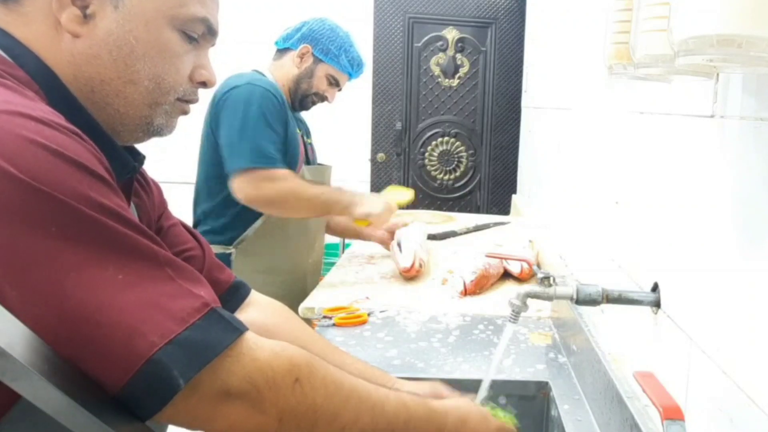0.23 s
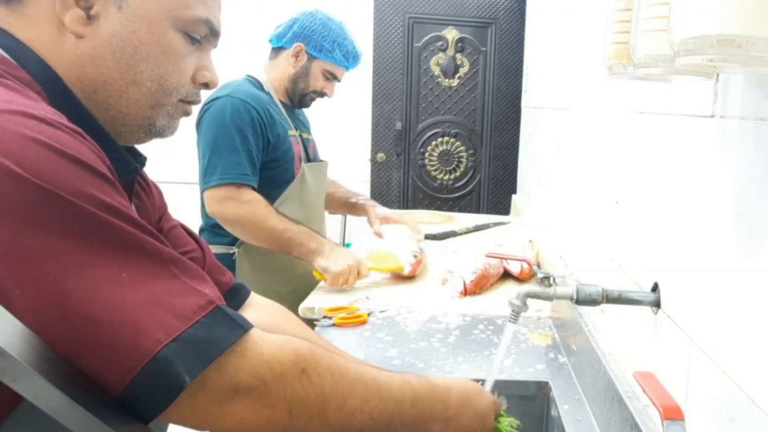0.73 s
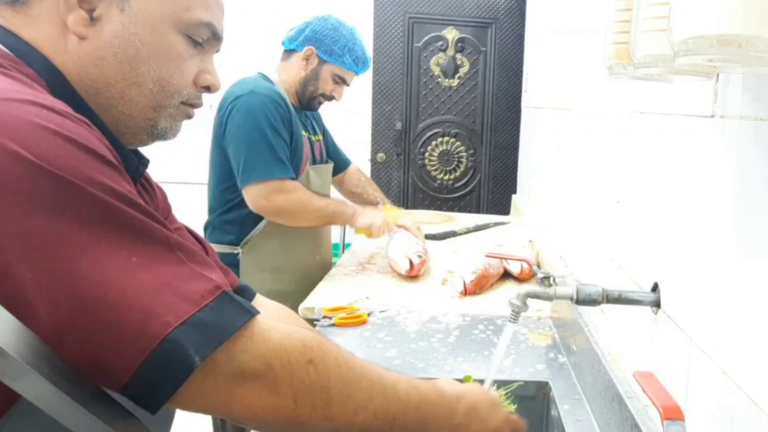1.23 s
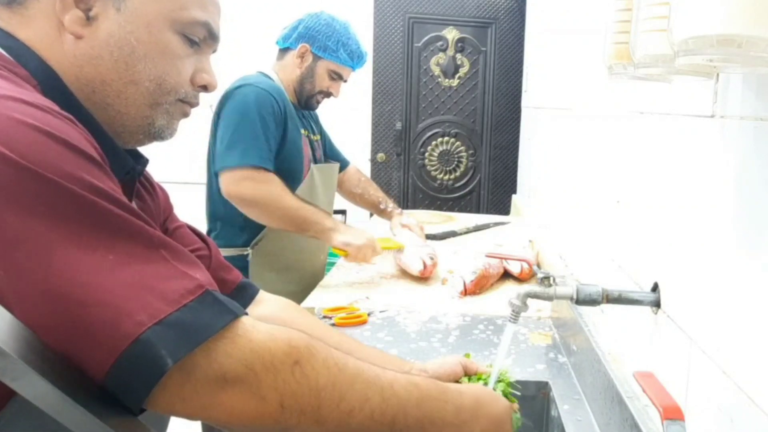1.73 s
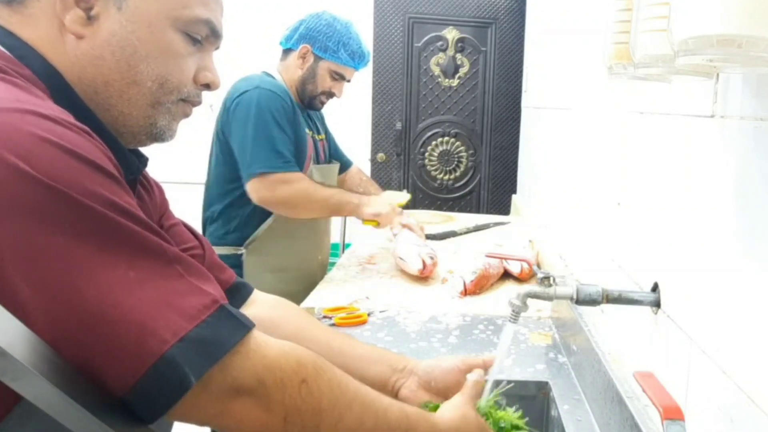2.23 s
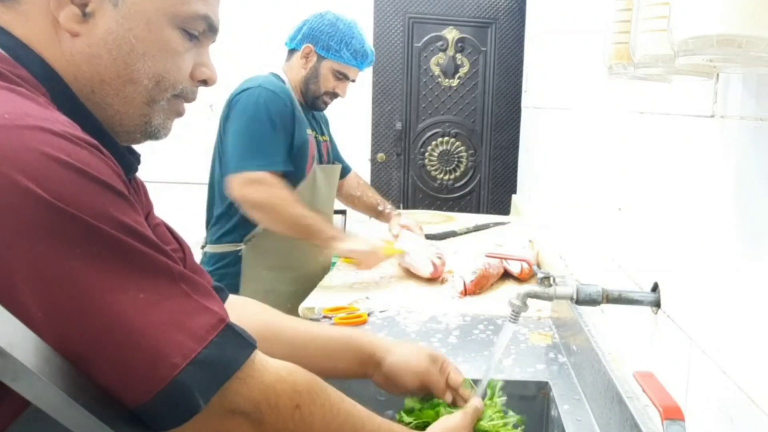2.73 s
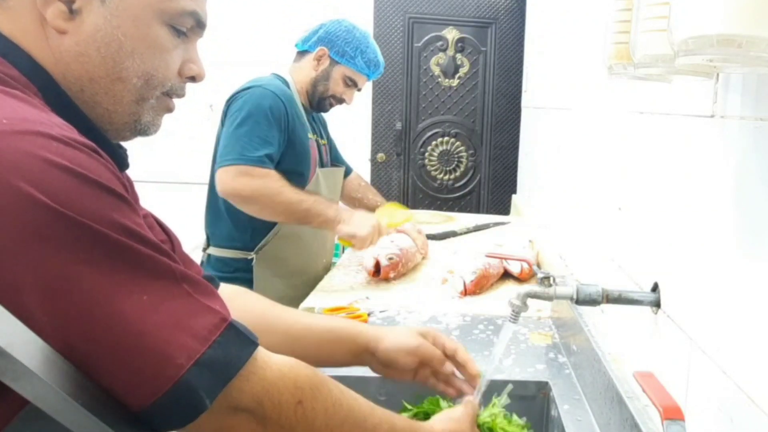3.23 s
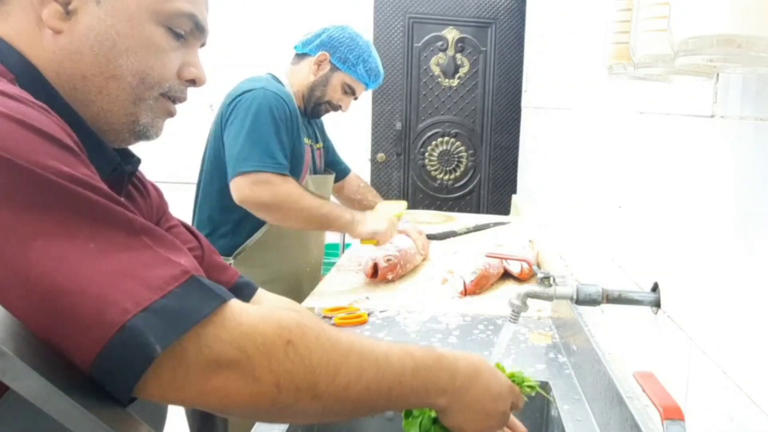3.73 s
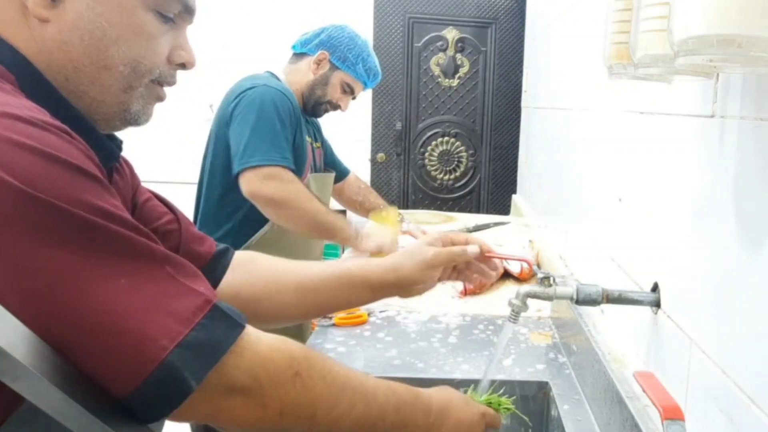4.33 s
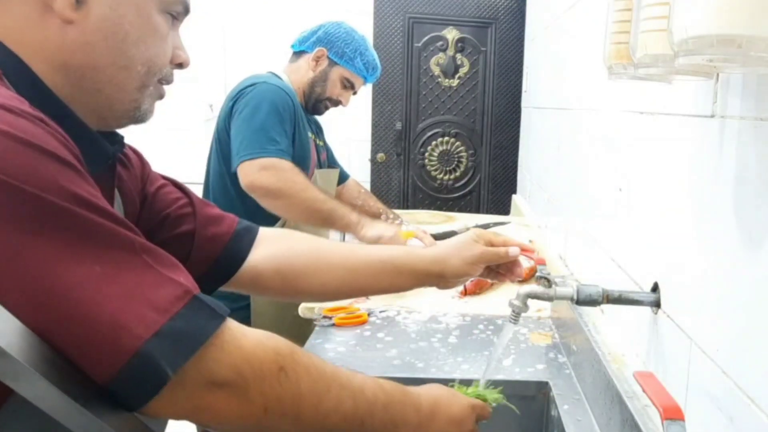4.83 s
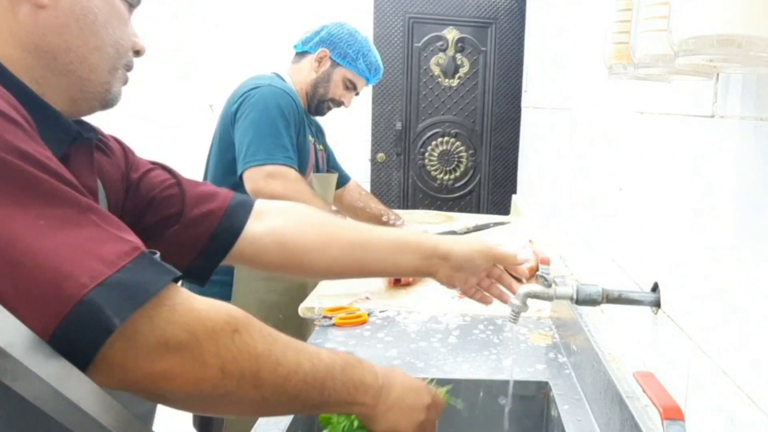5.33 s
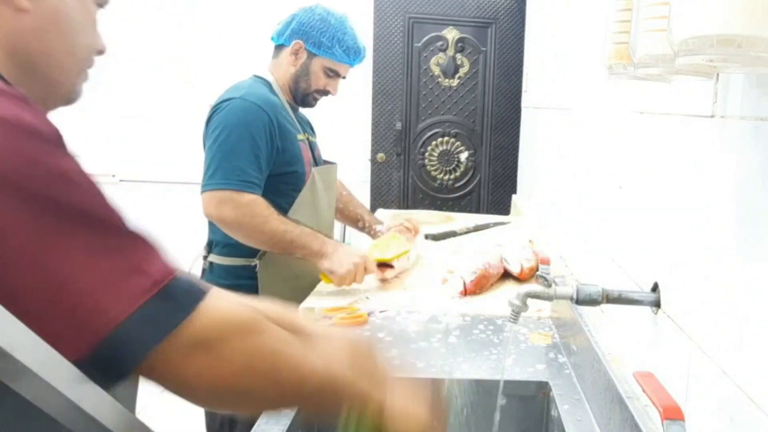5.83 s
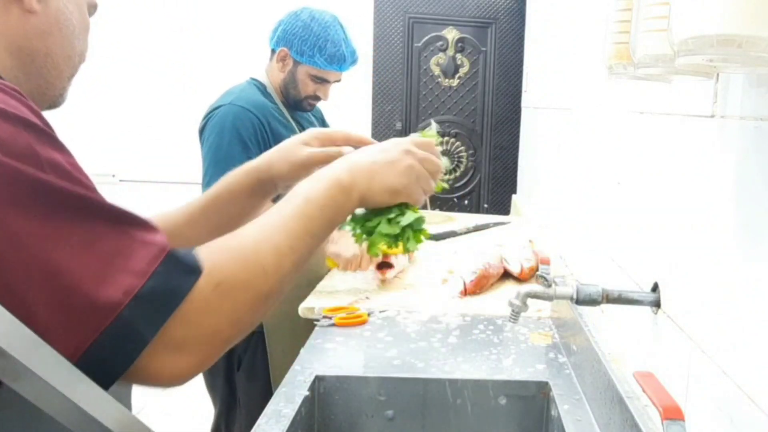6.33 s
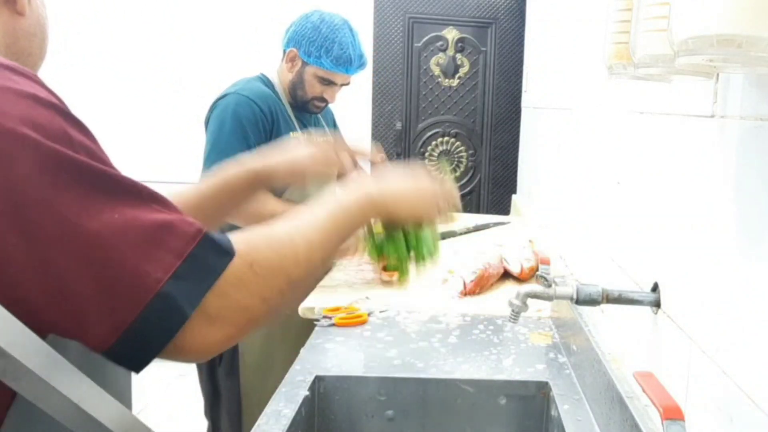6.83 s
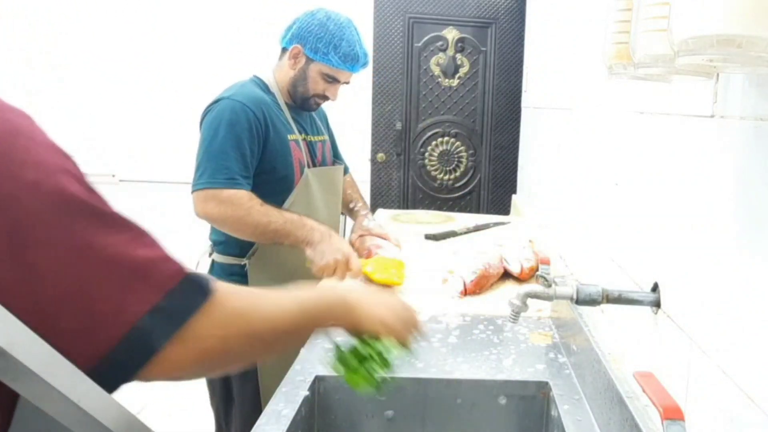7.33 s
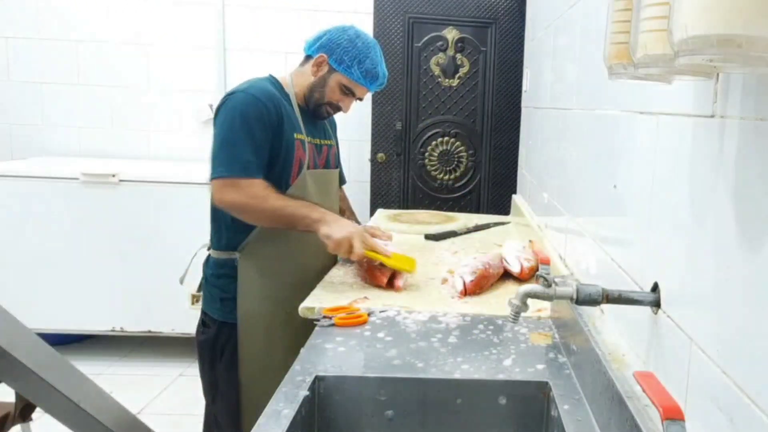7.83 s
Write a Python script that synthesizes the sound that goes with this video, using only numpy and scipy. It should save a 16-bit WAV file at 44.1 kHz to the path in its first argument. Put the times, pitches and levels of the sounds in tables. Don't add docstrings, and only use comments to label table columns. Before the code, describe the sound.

Bright gritty scraping and knocking of a fish scaler over splashing tap water, which stops before wet herbs are shaken and a few faint strokes follow.

```python
import sys
import numpy as np
from scipy import signal
from scipy.fft import rfft, irfft, next_fast_len
from scipy.io import wavfile
from scipy.ndimage import uniform_filter1d, map_coordinates

SR = 44100
rng = np.random.default_rng(int(sys.argv[2]) if len(sys.argv) > 2 else 0)


def wrap_up_sound(samples):
    columns = np.atleast_2d(samples).T
    tamed = np.clip(columns, -1, 1)
    steps = np.round(tamed * 32767).astype(np.int16)
    wavfile.write(sys.argv[1], SR, steps)


def undo_db(level):
    steps = np.asarray(level, float) / 20
    return 10 ** steps


N = 356769

# time_s, level_db
FLOW = [(0.0, -53), (0.3, -56), (1.25, -57), (1.5, -51.5), (1.9, -60), (2.3, -54), (2.6, -58.5),
        (3.7, -56.5), (4.0, -54), (4.5, -61.5), (5.3, -51.5), (5.7, -63), (6.06, -66.5), (6.3, -73.5),
        (6.83, -73), (7.1, -66), (7.3, -69.5), (8.09, -69)]
# start_s, rasp_db, knock_db, thump_db, length_s
DRAGS = [
    (0.0342, -22.5, -49, -49, 0.08),
    (0.3657, -24.5, -53.5, -48.5, 0.087),
    (1.334, -23, -50.5, -48.5, 0.035),
    (1.6967, -30, -72, -47.5, 0.073),
    (2.0333, -28.5, -58, -48, 0.051),
    (2.3556, -29.5, -58, -44, 0.053),
    (2.7193, -33.5, -61, -48, 0.067),
    (3.205, -37.5, -85, -83, 0.081),
    (7.8036, -34.5, -72, -86, 0.065),
    (8.0584, -45, -73, -66, 0.14),
]
# start_s, rasp_db, knock_db, clack_db, knock_pitch_hz
BLOWS = [
    (3.5471, -20.5, -40.5, -36, 820),
    (3.8497, -22.5, -44.5, -44, 1146),
    (4.146, -23, -48.5, -43.5, 906),
    (4.4151, -22.5, -45, -40, 1410),
    (4.7354, -29, -48.5, -48.5, 1890),
    (5.0626, -20.5, -43.5, -41, 810),
    (5.3842, -27.5, -49, -45, 850),
    (7.4737, -47, -70.5, -66, 1900),
    (7.7788, -34, -54, -61, 870),
]
# start_s, rasp_db, length_s
SHAKES = [
    (5.943, -38, 0.11),
    (6.5837, -32.5, 0.087),
    (6.8996, -32.5, 0.076),
    (7.1526, -43, 0.044),
]
# pitch_hz, width_hz, level_db
COMB = [(1430, 1700, -3), (2700, 490, 1), (5440, 3600, 0)]
# pitch_hz, level_db
RASP = [(1500, -16), (3500, -36.5), (4700, -5.5), (6500, -5), (8400, 4), (10000, -4.5), (12500, -18.5),
        (15500, -13.5)]


def unit(x):
    return x / np.sqrt(np.mean(x ** 2) + 1e-20)


def peak(x):
    return x / np.abs(x).max()


def along(points, hz):
    f, v = np.transpose(points)
    return np.interp(np.log(hz + 1), np.log(f + 1), v)


def flow_level():
    s, db = np.transpose(FLOW)
    return np.interp(np.arange(N) / SR, s, db)


def wobble(rate):
    knots = rng.standard_normal(int(N * rate / SR) + 4)
    return map_coordinates(knots, [np.arange(N) * rate / SR])


def filtered(x, response):
    m = next_fast_len(len(x) + min(len(x), 8192))
    return irfft(rfft(x, m) * response(np.fft.rfftfreq(m, 1 / SR)), m)[:len(x)]


def coloured(x, spectrum):
    cepstrum = irfft(np.log(undo_db(along(spectrum, np.fft.rfftfreq(2048, 1 / SR)))))
    cepstrum[1:1024] *= 2
    cepstrum[1025:] = 0
    return signal.fftconvolve(x, irfft(np.exp(rfft(cepstrum))))[:len(x)]


def resonant(x, modes):
    def response(f):
        total = 0
        for k, (hz, width, db) in enumerate(modes):
            damping = 1j * f * width
            total = total + (-1) ** k * undo_db(db) * damping / (hz * hz - f * f + damping)
        return total
    return filtered(x, response)


def twice_resonant(x, hz, width):
    return resonant(resonant(x, [(hz, width, 0)]), [(hz, width, 0)])


def rush(spectrum, patchy_db):
    z = signal.stft(rng.standard_normal(N), nperseg=512)[2]
    field = uniform_filter1d(rng.standard_normal(z.shape), 9, 0)
    field = uniform_filter1d(field, 5, 1)
    noise = signal.istft(z * undo_db(patchy_db * unit(field)), nperseg=512)[1][:N]
    return unit(filtered(noise, lambda hz: undo_db(along(spectrum, hz))))


def echo(x):
    # pitch_hz, t60_s
    room = [(100, 0.86), (700, 0.62), (2000, 0.82), (5000, 0.67), (12000, 0.38)]
    hz, t, z = signal.stft(rng.standard_normal(SR * 3 // 4), SR, nperseg=256)
    tail = signal.istft(z * undo_db(-60 * t / along(room, hz)[:, None]), SR, nperseg=256)[1]
    tail = tail * (1 - np.exp(-np.arange(len(tail)) / SR / 0.0043))
    return signal.fftconvolve(x, tail / np.linalg.norm(tail))


def add(track, s, sound):
    place = track[round(s * SR):][:len(sound)]
    place += sound[:len(place)]


def scattered(start_s, per_s, count):
    return start_s + (np.arange(count) + rng.random(count)) / per_s


def hum():
    # pitch_hz, level_db_per_hz
    rumble = [(12, -27), (20, -21), (38, -12.5), (58, -1), (81, -4.5), (156, -7), (192, -15), (228, -11.5),
              (305, -23), (354, -16.5), (436, -19), (2700, -80), (3000, -53), (3900, -62), (6600, -120)]
    # pitch_hz, level_db_per_hz
    far_hiss = [(880, -41), (1500, -16), (2770, -5), (3120, -10), (3800, -4), (4110, -38), (8280, -1),
                (15900, -10)]
    flow_mid_db, follows = -56, 0.24
    drone_db = -64.5 + follows * (flow_level() - flow_mid_db) + 0.85 * wobble(1.72)
    drone = undo_db(drone_db) * rush(rumble, patchy_db=2.0)
    return drone + undo_db(-81.5) * rush(far_hiss, patchy_db=-1.5)


def droplets(rate, spread_db):
    # pitch_hz, width_hz, level_db
    sizes = [(2600, 2100, -11), (5720, 2500, -2), (8280, 850, -0.5), (11900, 2600, -14)]
    out, t = np.zeros(N), np.arange(500) / SR
    clump = undo_db(2.3 * wobble(18))
    puff = undo_db(-60 * t / .014) * (1 - np.exp(-t / .0006))
    for hz, width, db in sizes:
        chance, size = rng.random((2, N))
        hits = (chance < rate / SR * clump) * undo_db(-spread_db * np.log(size + .02))
        puffs = signal.oaconvolve(hits, puff)[:N]
        edges = [hz - width / 2, hz + width / 2]
        band = signal.butter(2, edges, "band", fs=SR, output="sos")
        out += undo_db(db) * unit(signal.sosfilt(band, puffs * rng.standard_normal(N)))
    return unit(out)


def bubble(hz, t):
    life = 9 / hz
    tone = np.sin(2 * np.pi * hz * (t + 0.039 * t * t / life))
    return tone * np.exp(-t / life) * (1 - np.exp(-t * hz / 1.2))


def gurgles():
    # start_s, length_s, level_db, pitch_hz
    runs = [
        (0.974, 0.27, -55.5, 1470),
        (2.175, 0.17, -57, 940),
        (3.202, 0.12, -52, 1900),
        (5.747, 0.4, -66.5, 1270),
    ]
    rows = []
    for s, length, db, hz in runs:
        times = scattered(s, per_s=45, count=40)
        size, pitch = rng.standard_normal((2, 40))
        for a, b, c in zip(times, size, pitch):
            if a < s + length:
                rows.append((a, db + 2.7 * b, hz * np.exp(0.35 * c)))
    return rows


def water():
    # pitch_hz, level_db_per_hz
    spray_shape = [(1760, -37), (3000, -21), (3280, -15), (3550, -5.5), (4750, -8.5), (7030, 1.5),
                   (8250, 5), (11900, -13), (15900, -56)]
    # pitch_hz, level_db_per_hz
    splash_shape = [(400, -63), (700, 4), (1200, 2.5), (2500, 2), (4500, -7), (8000, -8.5)]
    # start_s, peak_db, pitch_hz
    big_bubbles = [(0.266, -45, 1790), (0.59, -47, 3070), (0.681, -49, 2400), (0.977, -40, 1983),
                   (1.018, -45, 3050), (1.04, -58, 1133), (1.108, -51.5, 1180), (1.135, -48.5, 2460),
                   (1.235, -58, 1180), (1.281, -47.5, 1900), (2.01, -51, 1900), (2.271, -49, 1713),
                   (2.824, -47.5, 1180), (2.976, -52, 1490), (2.99, -57, 1900), (3.207, -45.5, 2530),
                   (3.259, -48.5, 1710), (5.598, -55, 1090), (5.903, -57, 1310), (6.09, -52.5, 1260)]
    # start_s, level_db, pitch_hz, width_hz, t60_s
    basin_rings = [
        (1.02, -65, 647, 90, 0.34),
        (2.151, -64, 918, 150, 1.2),
        (5.661, -41.5, 4100, 800, 0.027),
        (6.38, -81, 2700, 160, 0.83),
        (6.641, -65.5, 2450, 90, 0.81),
        (6.95, -67, 2490, 111, 0.7),
    ]
    spray_db = flow_level()
    splash_db = spray_db - 9
    surge = wobble(7.6)
    mist = rush(spray_shape, patchy_db=.6)
    spray = undo_db(spray_db + 1.2 * surge) * (.75 * mist + .6 * droplets(rate=120, spread_db=3.5))
    splash = undo_db(splash_db + 1.2 * surge + 1.2 * wobble(18)) * rush(splash_shape, patchy_db=1.2)
    near, t = np.zeros(N), np.arange(1500) / SR
    for s, db, hz in big_bubbles + gurgles():
        add(near, s, undo_db(db - 1.0) * bubble(hz, t))
    for when, pitch, size in rng.random((500, 3)):
        s = when * 6.3
        db = splash_db[round(s * SR)] - 5 - 3 * np.log(size + .01)
        add(near, s, undo_db(db) * bubble(800 * 5 ** pitch, t))
    t = np.arange(SR // 2) / SR
    for s, db, hz, width, t60 in basin_rings:
        ring = unit(twice_resonant(rng.standard_normal(len(t)), hz, width))
        add(near, s, undo_db(db - 60 * t / t60) * ring)
    return spray + splash + near + undo_db(-9) * echo(near)[:N]


def stroke(rasp_db, knock_db, clack_db, thump_db, length, note_hz, teeth, hit, lean_db, wet_db, rise_s=0.0012):
    # pitch_hz, width_hz, level_db
    handle = [(773, 343, 6), (1295, 670, 3.5)]
    # pitch_hz, width_hz, level_db
    table = [(59.7, 37, 2), (137.5, 41, -0.5), (217.3, 46, 1.5), (494, 54, -7.5)]
    t = np.arange(SR // 5) / SR
    pressure = (1 - np.exp(-t / rise_s)) / (1 + (t / max(length, .005)) ** 6)
    catches = (rng.random(len(t)) < 250 / SR) * undo_db(3.5 * rng.standard_normal(len(t)))
    slips = signal.fftconvolve(catches, undo_db(-60 * t[:600] / 0.008))[:len(t)]
    noise = rng.standard_normal((4, len(t)))
    drag = pressure * (.5 + slips) * undo_db(lean_db * np.minimum(t / length, 1))
    crack = 5 * hit * undo_db(-60 * t / 0.0021)
    blow = 0.21 * drag * noise[1:3]
    blow[:, [0, 95]] += hit * np.array([7, -4])
    rasp = coloured((drag + crack) * noise[0], RASP)
    knock = resonant(resonant(blow[0], handle), [(1130, 2300, 0)])
    knock = knock + resonant(knock, [(note_hz, 0.3 * note_hz, 7)])
    clack = resonant(resonant(blow[1], teeth), [(2830, 14000, 0)])
    thump = resonant(resonant(pressure * noise[3], table), [(147, 390, 0)])
    close = undo_db(rasp_db) * unit(rasp) + undo_db(knock_db) * unit(knock)
    close = close + undo_db(clack_db) * unit(clack) + undo_db(thump_db) * unit(thump)
    wet = undo_db(wet_db) * echo(close)
    add(wet, 0, close)
    return undo_db(-10.0) * wet


def long_drags():
    out = np.zeros(N)
    for s, db, knock_db, thump_db, length in DRAGS:
        add(out, s, stroke(db - 16.5, knock_db, db - 19, thump_db, length, note_hz=1180, teeth=COMB,
                           hit=0.065, lean_db=6, wet_db=-2.0))
    return out


def small_snaps():
    rows = [(s, db - 9) for s, db, *_ in BLOWS]
    rows += [(s, db - 4) for s, db, *_ in DRAGS]
    for s, db, *_, length in DRAGS + SHAKES:
        times = scattered(s, per_s=45, count=12)
        for a, size in zip(times, rng.standard_normal(12)):
            if a < s + length:
                rows.append((a, db - 9 + 8.5 * size))
    tap_shut_s = 5.9
    for a, size in zip(scattered(0, per_s=5, count=90), rng.standard_normal(90)):
        if a < tap_shut_s:
            rows.append((a, np.interp(a, *np.transpose(FLOW)) + 18 + 1.8 * size))
    return [(s, db, 8300 * np.exp(-0.15 * (rng.exponential() - .5))) for s, db in rows]


def snaps():
    # start_s, peak_db, pitch_hz
    bursting = [(0.6809, -32, 8140), (0.7123, -30.5, 8970), (1.0303, -31.5, 7810), (1.284, -27, 5100),
                (1.556, -28.5, 7600), (1.5938, -31, 6420), (1.869, -27, 7960), (1.9027, -30, 7770),
                (1.9688, -30.5, 5900), (2.0148, -28.5, 8600), (2.5593, -26.5, 5620), (2.882, -28, 7400),
                (2.9508, -29, 5130), (2.9977, -27, 8040), (3.2877, -29.5, 7800), (3.321, -29, 7630),
                (3.397, -33, 8300), (3.4451, -29.5, 8400), (4.0653, -25.5, 8200), (4.1071, -27, 8200),
                (4.9034, -31, 8000), (4.9703, -29, 8780), (5.244, -23, 5010), (5.2805, -30, 8280),
                (5.5822, -31, 6340), (6, -29.5, 7800), (6.131, -33, 7160), (7.5687, -40.5, 8500)]
    # start_s, peak_db, pitch_hz
    torn_loose = [(0.0383, -23.5, 5530), (0.0902, -30, 7980), (0.1017, -29, 8740), (0.102, -22.5, 4400),
                  (0.3667, -25, 6400), (0.403, -23, 8650), (0.416, -24, 8430), (1.336, -11, 8550),
                  (1.7091, -17, 8600), (1.717, -12.5, 8500), (2.0458, -18, 8550), (2.3827, -24.5, 8600),
                  (3.856, -19, 8650), (3.872, -21, 8670), (4.146, -21, 4600), (4.441, -17, 8600),
                  (5.446, -24, 9150), (5.9523, -31, 9160), (7.1553, -31, 8350), (6.609, -30, 7530),
                  (6.6341, -24.5, 5830), (6.9216, -24, 8350), (6.939, -29, 8200), (6.9546, -25.5, 6660),
                  (7.787, -31.5, 8750), (7.857, -31, 8460), (7.875, -19.5, 8800), (7.8994, -30, 8680)]
    groups, t = np.zeros((4, N)), np.arange(700) / SR
    envelope = undo_db(-60 * t / .016) * (1 - np.exp(-t / .0006))
    for k, (s, db, hz) in enumerate(bursting + torn_loose + small_snaps()):
        burst = envelope * rng.standard_normal((2, len(t)))
        ring = twice_resonant(burst[0], hz, .3 * hz)
        crackle = 0.68 * (hz / 8000) ** 2 * coloured(burst[1], RASP)
        add(groups[k % len(groups)], s, undo_db(db - 8.0) * peak(ring + crackle))
    return sum(group + undo_db(-4.5) * echo(group)[:N] for group in groups)


def hard_landings():
    # pitch_hz, width_hz, level_db
    head = [(1900, 810, 5), (2756, 173, 8), (3780, 1670, 0)]
    out = np.zeros(N)
    for s, db, knock_db, clack_db, hz in BLOWS:
        add(out, s, stroke(db - 19.0, knock_db + 0.5, clack_db - 3, db - 29, 0.034, note_hz=hz, teeth=head,
                           hit=0.94, lean_db=-5.5, wet_db=0.5))
    return out


def herb_shakes():
    out = np.zeros(N)
    for s, db, length in SHAKES:
        add(out, s, stroke(db - 17.0, db - 38, db - 17.5, db - 35.5, length, note_hz=1097, teeth=COMB,
                           hit=0, rise_s=0.0071, lean_db=2, wet_db=-1.5))
    return out


def scene():
    mono = hum() + water() + long_drags() + snaps() + hard_landings() + herb_shakes()
    return np.array([mono, mono])


def roll_off(x):
    return signal.sosfilt(signal.butter(12, 16460, fs=SR, output="sos"), x)


def record(dry):
    # pitch_hz, level_db
    difference = [(30, -39), (200, -33), (1000, -33), (2500, -29.5), (8000, -35.5), (13000, -23)]
    mono = filtered(dry[0], lambda hz: hz < 15850)
    side = filtered(mono * wobble(30), lambda hz: undo_db(along(difference, hz) + 5))
    return roll_off(np.array([mono + side, mono - side]))


dry = scene()
out = record(dry)
wrap_up_sound(out)
```